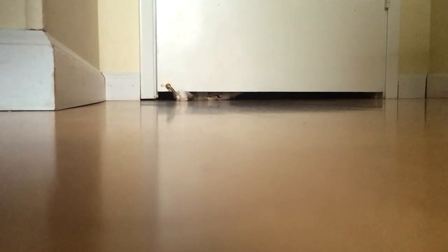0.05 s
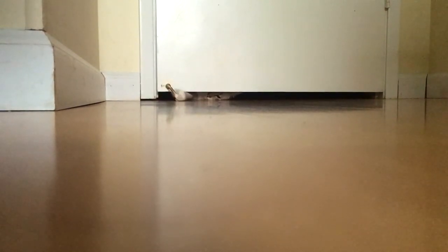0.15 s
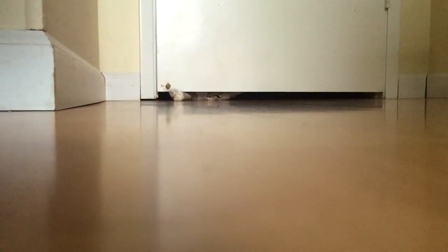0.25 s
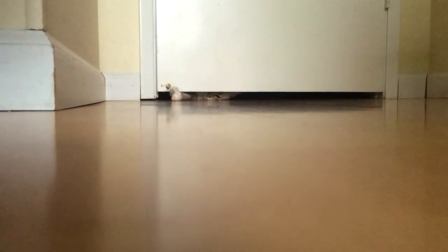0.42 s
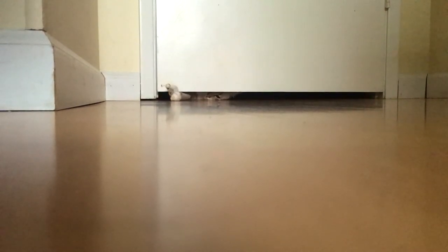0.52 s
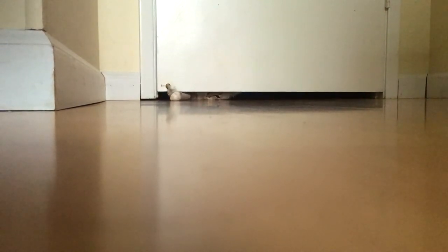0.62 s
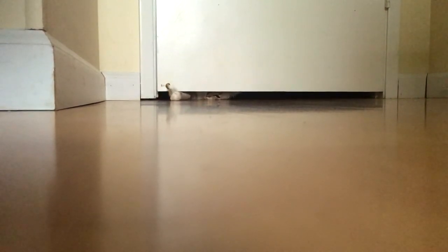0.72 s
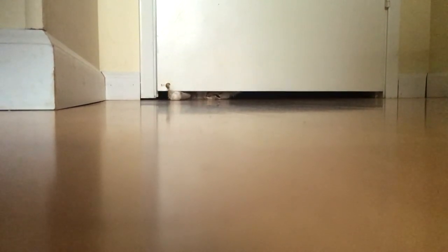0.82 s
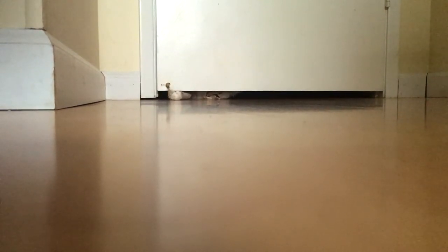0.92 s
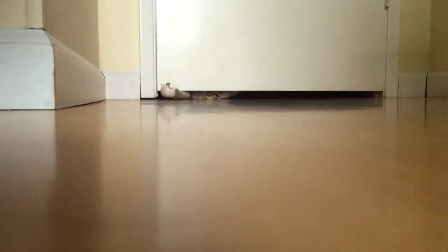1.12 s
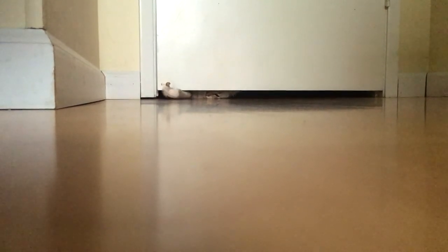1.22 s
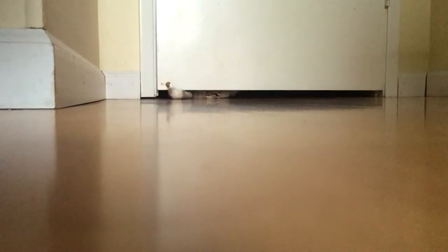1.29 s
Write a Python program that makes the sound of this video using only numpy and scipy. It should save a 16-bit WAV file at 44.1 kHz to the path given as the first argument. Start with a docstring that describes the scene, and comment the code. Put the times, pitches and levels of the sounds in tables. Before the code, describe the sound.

A spring door stopper is flicked at about 0.2 seconds and twangs with a rapid, fluttering metallic rattle over a low boom. Loudest at the start, the clacks get faster and softer until they die out around 0.9 seconds. A low hum lingers slightly longer, and two faint ticks come at about 1.1 and 1.2 seconds. It is heard from floor level in a small, quiet room.

```python
"""A spring door stopper, flicked near the foot of a door in a small hard room; one microphone at floor level.
The spring whips to and fro and its coils clack shut on every swing, faster and softer as it settles.
Each clack rings the spring and the door; a low boom under the rattle lingers as the spring's hum.
Faint ticks follow, over quiet room tone."""
import sys
import numpy as np
from scipy import signal
from scipy.fft import rfft, irfft
from scipy.io import wavfile
from scipy.ndimage import map_coordinates

SR = 44100
rng = np.random.default_rng(int(sys.argv[2]) if len(sys.argv) > 2 else 0)


def wrap_up_sound(samples):
    """Save the sound to the file named by the first command line argument, as 16-bit audio."""
    columns = np.atleast_2d(samples).T
    # keep every value between -1 and 1, then stretch to whole-number steps
    tamed = np.clip(columns, -1, 1)
    steps = np.round(tamed * 32767).astype(np.int16)
    wavfile.write(sys.argv[1], SR, steps)


N = 59535


def undb(db):
    """Decibels to gain."""
    return 10 ** (np.asarray(db) / 20)


def at_hz(hz, points, values):
    """Read a curve on a log-frequency axis."""
    return np.interp(np.log(hz + 1), np.log(points), values)


def noise(shape):
    """Noise of rms 1 whose spectrum is shape(Hz)."""
    hz = np.arange(N // 2 + 1) * SR / N
    x = irfft(rfft(rng.standard_normal(N)) * shape(hz), N)
    return x / x.std()


def band(hz, width):
    """A band of noise with steep sides."""
    return noise(lambda f: 1 / np.sqrt(1 + (2 * (f - hz) / width) ** 6))


def fade(t, t60):
    """Exponential decay that starts at t = 0."""
    return (t >= 0) * np.exp(-np.log(1000) * np.abs(t) / t60)


def blows(times, sizes):
    """One impulse for each blow."""
    x = np.zeros(N)
    np.add.at(x, np.clip(np.round(times * SR).astype(int), 0, N - 1), sizes)
    return x


def ring(x, response):
    """Let a response follow every impulse."""
    return signal.fftconvolve(x, response)[:N]


def swell(x, envelope):
    """Joint level of overlapping, unrelated decays."""
    return np.sqrt(np.abs(ring(x ** 2, envelope ** 2)))


def lag(hz):
    """Travel time in seconds of a bending wave, slower in the bass."""
    return 0.001626 * np.sqrt(999 / hz)


def mode(t, times, hz, db, t60, build_cycles=2.2):
    """One ringing tone that gains energy from each blow; low ones build slowly."""
    envelope = fade(t, t60) * (1 - np.exp(-t * hz / build_cycles))
    return swell(blows(times + lag(hz), undb(db)), envelope) * np.sin(2 * np.pi * hz * t)


def tone(t, times, hz, db):
    """A sine that follows a pitch and a level, silent outside them."""
    level = undb(np.interp(t, times, db, left=-120, right=-120))
    phase = 2 * np.pi * np.cumsum(np.interp(t, times, hz)) / SR
    return np.sqrt(2) * level * np.sin(phase)


# The quiet room. Each row: frequency in Hz, relative level in dB.
ROOM_SPECTRUM = [(25, -9), (48, 8), (85, -1.5), (140, -6.5), (210, -6), (330, -9), (1050, -22.5),
                 (3500, -37), (6000, -42.5), (15500, -39)]


def room_tone(level_db=-58.5, low_cut_hz=28):
    """Low rumble with a little hiss, all round the microphone."""
    def spectrum(hz):
        return undb(at_hz(hz, *np.array(ROOM_SPECTRUM).T)) * hz ** 2 / (hz ** 2 + low_cut_hz ** 2)
    return undb(level_db) * noise(spectrum)


# The coils clacking shut. Each row: start in seconds, then snap, knock, clatter and fizz levels in dB.
COIL_CLACKS = [(0.1878, -51.5, -42.5, -48.5, -67), (0.2033, -36, -33.5, -31.5, -46),
               (0.2335, -38, -35.5, -33.5, -44), (0.262, -37, -34, -36, -52),
               (0.2912, -41.5, -38.5, -39.5, -52), (0.3214, -45.5, -49.5, -41, -52),
               (0.3485, -43, -40.5, -49.5, -60), (0.378, -47, -49, -46, -57), (0.402, -48.5, -51, -47, -63),
               (0.4321, -45, -48, -49, -55.5), (0.4565, -46, -53.5, -48.5, -59.5),
               (0.4821, -57, -38.5, -43, -60), (0.506, -44, -45.5, -55, -55.5),
               (0.533, -45, -53.5, -45.5, -58), (0.5606, -42.5, -44, -55, -50.5),
               (0.5806, -48, -47, -49, -63.5), (0.6045, -52, -53.5, -45.5, -58),
               (0.6243, -59, -52, -58, -74), (0.6445, -50.5, -47, -55, -65), (0.6665, -55, -71, -46, -72),
               (0.6855, -52, -52, -48.5, -64.5), (0.708, -51.5, -57, -50, -75),
               (0.7336, -57, -50.5, -57, -73), (0.7462, -53.5, -64, -45.5, -76),
               (0.766, -59, -55.5, -64, -82), (0.799, -54, -62, -55, -78), (0.817, -62, -58, -73, -74),
               (0.8346, -53, -58, -52, -77), (0.8562, -74, -64, -63, -79), (0.8784, -71, -65, -55.5, -93),
               (0.9043, -67, -75, -63, -95), (0.93, -80, -76, -72, -96)]
SNAP_HZ, KNOCK_HZ, CLATTER_HZ, FIZZ_HZ = 2570, 490, 1170, 6790
# A clack's colour. Each row: frequency in Hz, quarter-octave level in dB against the clack's level there.
CLACK_COLOUR = [(130, -17), (170, -12.5), (300, -10), (400, -14.5), (520, -18), (680, -9.5), (800, -15),
                (1100, -7.5), (1350, -14), (1600, -13), (2000, -9.5), (2750, -10.5), (3400, -10.5),
                (4300, -11), (5000, -16), (6300, -5), (7600, -13), (9000, -5.5), (10500, -13), (15000, -14)]
# Spring, door and room ringing on. Each row: frequency in Hz, short and long t60 in seconds,
# level of the long part in dB, rise in seconds.
RING_DECAYS = [(160, 0.052, 1, -7, 0.0049), (620, 0.15, 0.15, -12, 0.0014),
               (1260, 0.032, 0.42, -1.5, 0.0066), (3060, 0.081, 0.68, -20, 0.00089),
               (7000, 0.034, 0.28, -12.5, 0.0023), (14500, 0.009, 0.4, -19.5, 0.0005)]


def clack_db(hz):
    """Strength of every clack at one frequency."""
    return np.array([at_hz(hz, [KNOCK_HZ, CLATTER_HZ, SNAP_HZ, FIZZ_HZ], [knock, clatter, snap, fizz])
                     for _, snap, knock, clatter, fizz in COIL_CLACKS])


def rattle(t):
    """Every clack rings the same dense resonances, partly afresh; the lows arrive later."""
    times = np.array(COIL_CLACKS)[:, 0]
    points, *curves = np.array(RING_DECAYS).T
    out = 0
    for hz in 130 * 2 ** (np.arange(29) / 4):  # quarter-octave bands
        width = hz * np.log(2) / 4
        short_t60, long_t60, long_db, rise = (at_hz(hz, points, curve) for curve in curves)
        colour_db = at_hz(hz, *np.array(CLACK_COLOUR).T)
        hits = blows(times + lag(hz) - lag(FIZZ_HZ), undb(clack_db(hz) + colour_db))
        decay = np.hypot(fade(t, short_t60), undb(long_db) * fade(t, long_t60))
        envelope = (1 - np.exp(-t / rise)) * decay
        response = envelope * band(hz, width)
        response *= np.sqrt(np.sum(envelope ** 2) / np.sum(response ** 2))
        fresh = swell(hits, envelope) * band(hz, width)
        alike = 0.6 / (1 + (hz / 3600) ** 2)  # share of the ring that is the same on every clack
        out += np.sqrt(alike) * ring(hits, response) + np.sqrt(1 - alike) * fresh
    return out


def coil_cracks(t, level_db=-3.5, tap_hz=2060):
    """The brief, dry contact of coil on coil: a bright crack over a fuller tap."""
    times, snap, _, _, fizz = np.array(COIL_CLACKS).T
    contact = fade(t, t60=0.032)
    crack = swell(blows(times, undb(fizz)), contact) * band(hz=4260, width=4960)
    tap = swell(blows(times + lag(tap_hz), undb(snap)), contact) * band(tap_hz, width=1860)
    return undb(level_db) * (crack + tap)


# Low and middle tones that build up under the repeated clacks, then the bright modes of the wire.
# Each row: frequency in Hz, relative level in dB, t60 in seconds.
RATTLE_TONES = [(76.3, -4, .2), (100.5, -8, 0.29), (172, -4.5, 0.33), (187, -13, 0.4), (260, -10, 0.5),
                (327.6, -9.5, 0.47), (439, -13, 0.18), (562, -17.5, 0.28), (665, -7.5, 0.19),
                (702, -6.5, 0.19), (839, -14.5, 0.28), (880, -19, .35), (958, -15.5, 0.35),
                (1031, -13.5, 0.38), (1098, -13, 0.33), (1135, -12.5, .35), (1207, -13, 0.38)]
WIRE_MODES = [(1523, -17.5, 0.2), (1900, -16, 0.25), (2541, -15.5, 0.25), (2649, -12.5, 0.27),
              (2842, -15.5, 0.22), (3577, -19, 0.19)]


def twang(t, level_db=-2.5):
    """The repeated clacks build up clear ringing tones, which waver as the spring bends."""
    times = np.array(COIL_CLACKS)[:, 0]
    rings = sum(mode(t, times, hz, clack_db(hz) + db + level_db, t60)
                for hz, db, t60 in RATTLE_TONES + WIRE_MODES)
    flex_s = 0.00003 * band(hz=28, width=28)
    return map_coordinates(rings, [(t + flex_s) * SR], mode="nearest")


# The spring's ticks. Each row: start in seconds, level in dB, centre and width in Hz, t60 in seconds.
SPRING_TICKS = [(.1945, -44, 13000, 6500, .003), (.1955, -53, 3000, 3600, .02),
                (1.118, -72, 2400, 1200, .1), (1.192, -68, 4500, 10500, .05)]
# The ring of the last tick. Each row: frequency in Hz, level in dB, t60 in seconds.
LAST_TICK_MODES = [(4550, -69, .035), (5560, -81, .15), (6200, -71, .03)]


def ticks(t):
    """Small ticks as the spring slips free and after it has settled; the last one rings briefly."""
    clicks = sum(undb(db) * fade(t - start, t60) * band(hz, width)
                 for start, db, hz, width, t60 in SPRING_TICKS)
    last_start = np.array(SPRING_TICKS)[-1:, 0]
    return clicks + sum(mode(t, last_start, *row) for row in LAST_TICK_MODES)


# The wire's pings. Each row: centre and width in Hz, level in dB against the clack's capped fizz.
PING_BANDS = [(8810, 690, -6.5), (11430, 520, -15)]


def wire_pings(t, return_s=0.011, t60=0.021, loss_db=-19, cap_db=-53):
    """Each snap runs along the wire and comes back twice as a thin ping."""
    times, *_, fizz = np.array(COIL_CLACKS).T
    returns = fade(t - return_s, t60) + undb(loss_db) * fade(t - 2 * return_s, t60)
    level = swell(blows(times, undb(np.minimum(fizz, cap_db))), returns)
    return level * sum(undb(db) * band(hz, width) for hz, width, db in PING_BANDS)


# The spring's sway. Each row: time in seconds, pitch in Hz, level in dB.
SPRING_SWAY = [(.2, 34.6, -65), (.25, 34.8, -45), (.4, 36.7, -51), (.52, 38.4, -44), (.58, 39.19, -61),
               (0.661, 42.7, -48.5), (.72, 47, -64), (.85, 49, -80)]
# The low hum near 90 Hz. Each row: time in seconds, relative level in dB, pitch in Hz.
LOW_HUM = [(0.211, -40, 101), (.228, -47.5, 100.9), (.265, -47, 99.4), (0.294, -63, 100.4),
           (0.35, -46.5, 87.6), (0.431, -43.5, 88.68), (0.541, -45, 82.13), (0.589, -47.5, 85.7),
           (.615, -37, 88.65), (0.689, -46.5, 93.1), (0.72, -71, 87.5), (0.756, -43.5, 90.6),
           (0.801, -72, 93.94), (0.848, -56, 91.1), (0.922, -50.5, 92.4), (.945, -65, 90.8),
           (.975, -58, 90.4), (1.009, -69, 93.1), (1.045, -57.5, 95), (1.132, -66, 93)]


def low_hum(t, hum_db=-0.5, octave_db=-14):
    """An uneven boom with a weaker octave lingers as the spring's hum, over its deeper sway."""
    times, db, hz = np.array(LOW_HUM).T
    hum = tone(t, times, hz, db + hum_db) + tone(t, times, 2 * hz, db + octave_db)
    waver = 1 + 0.16 * band(hz=16, width=16)
    sway = tone(t, *np.array(SPRING_SWAY).T)
    return hum * waver + sway


def scene():
    """Room, spring and door at one microphone down by the floor."""
    t = np.arange(N) / SR
    mix = room_tone() + rattle(t) + coil_cracks(t) + twang(t) + ticks(t) + wire_pings(t) + low_hum(t)
    return mix[None]


def record(dry):
    """The recorder drops the deepest rumble and cuts the top."""
    low_cut = signal.butter(3, 24, "high", fs=SR, output="sos")
    top_cut = signal.ellip(10, .2, 70, 15900, fs=SR, output="sos")
    return signal.sosfilt(top_cut, signal.sosfilt(low_cut, dry))


dry = scene()
out = record(dry)
wrap_up_sound(out)
```